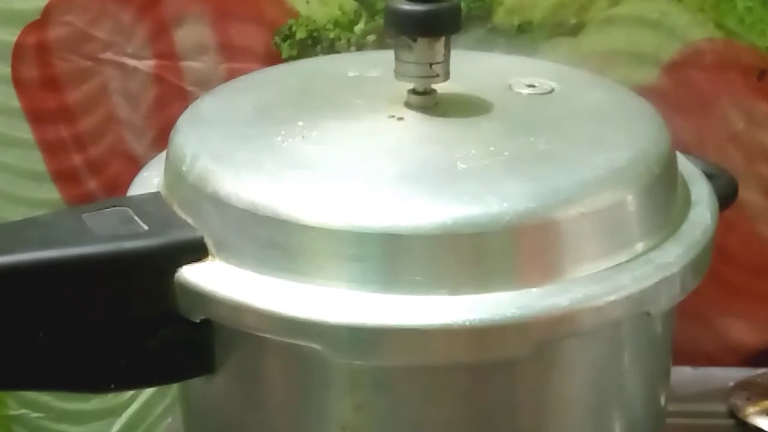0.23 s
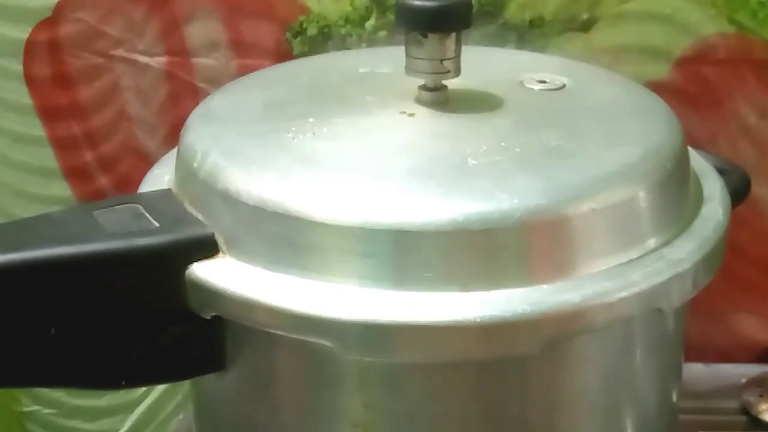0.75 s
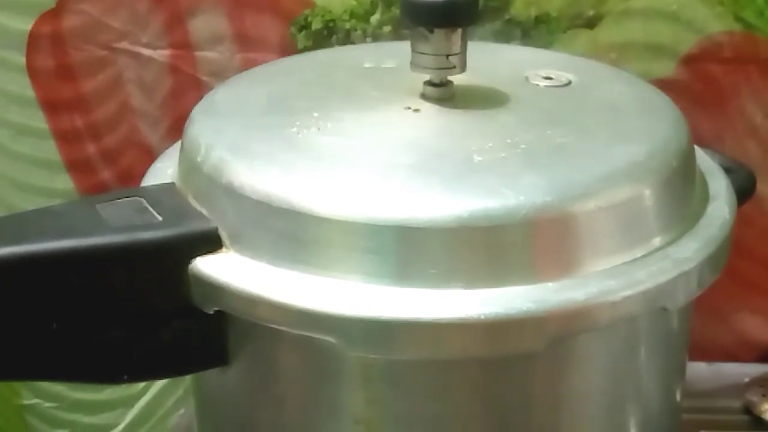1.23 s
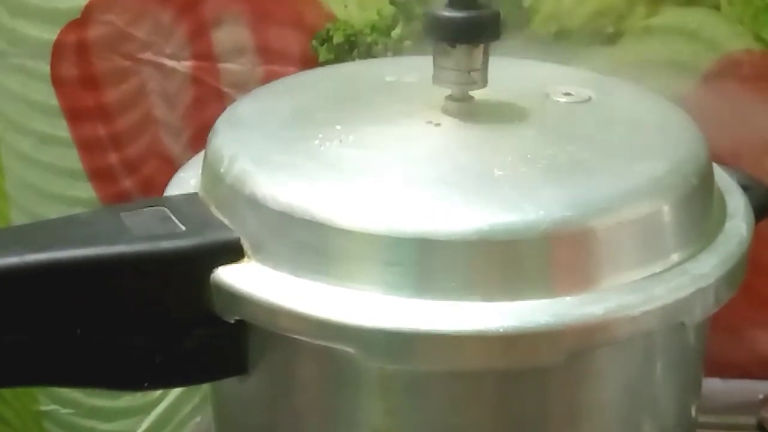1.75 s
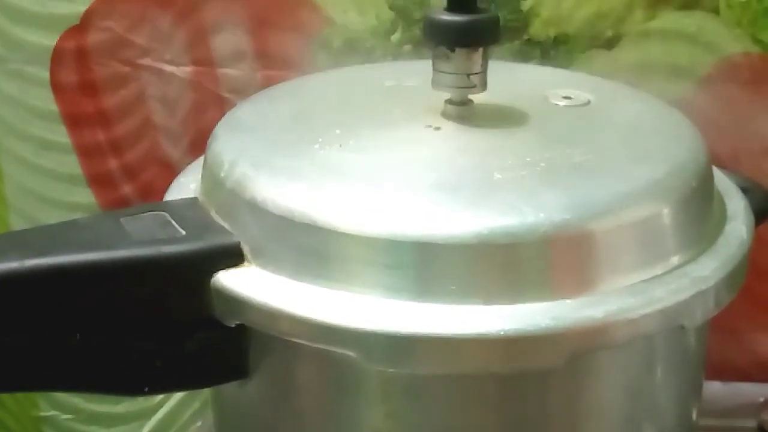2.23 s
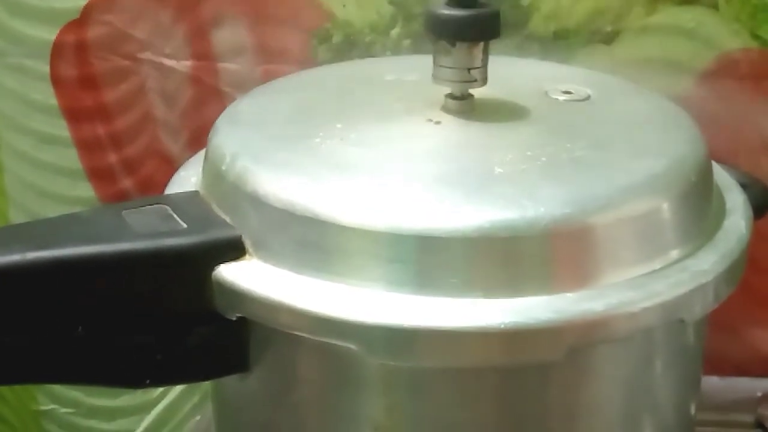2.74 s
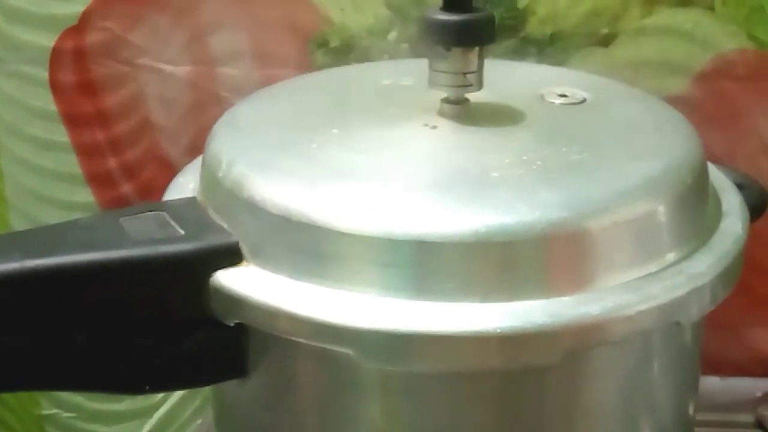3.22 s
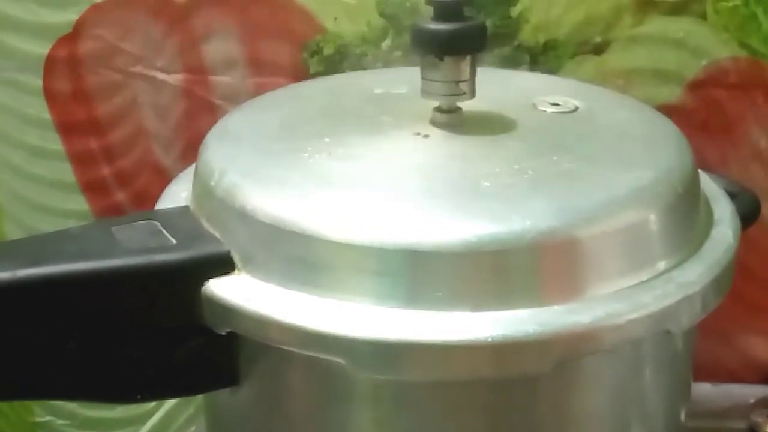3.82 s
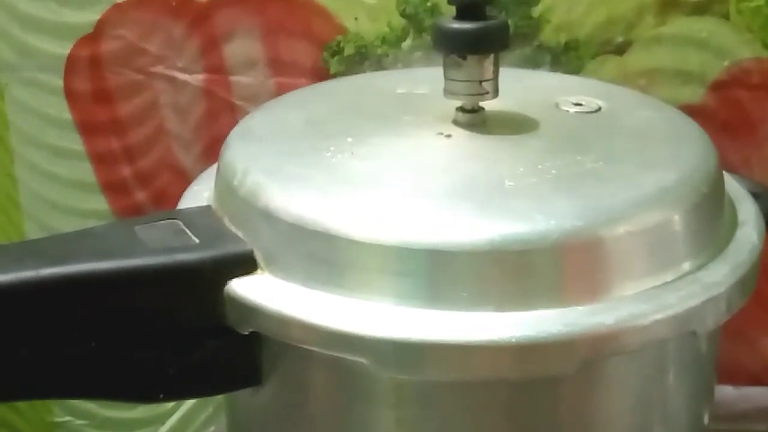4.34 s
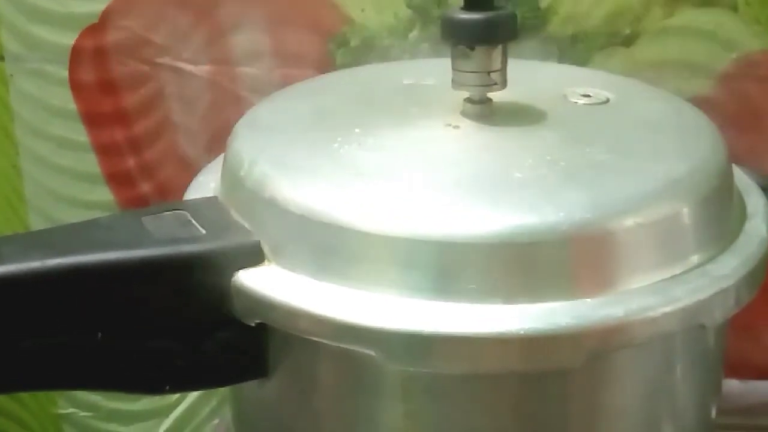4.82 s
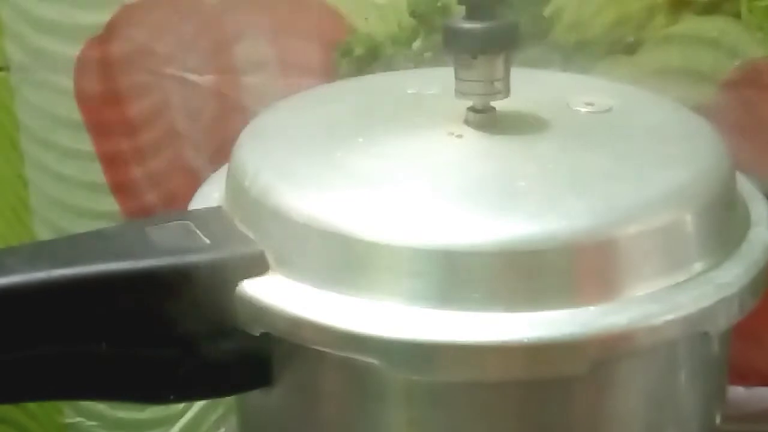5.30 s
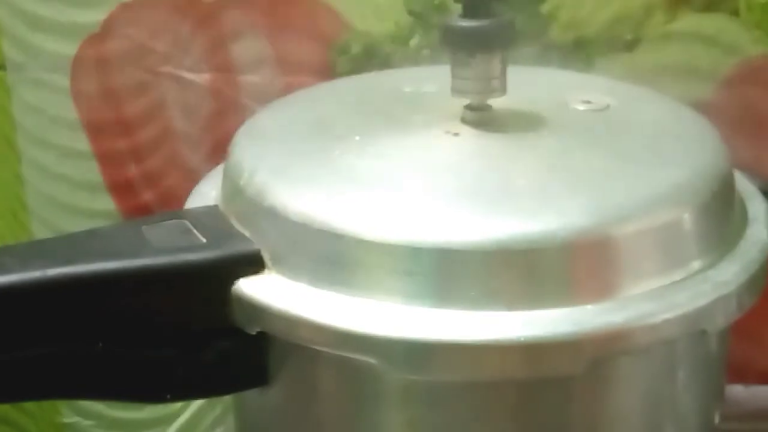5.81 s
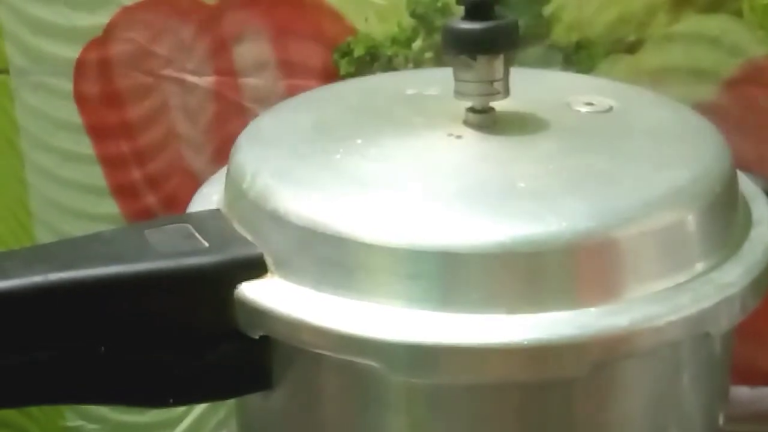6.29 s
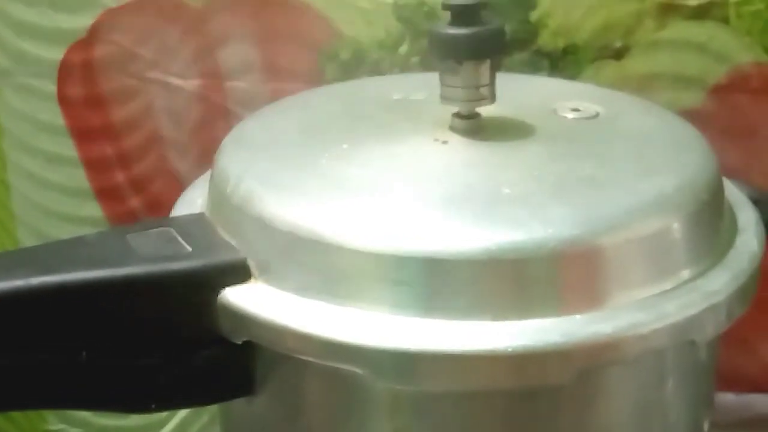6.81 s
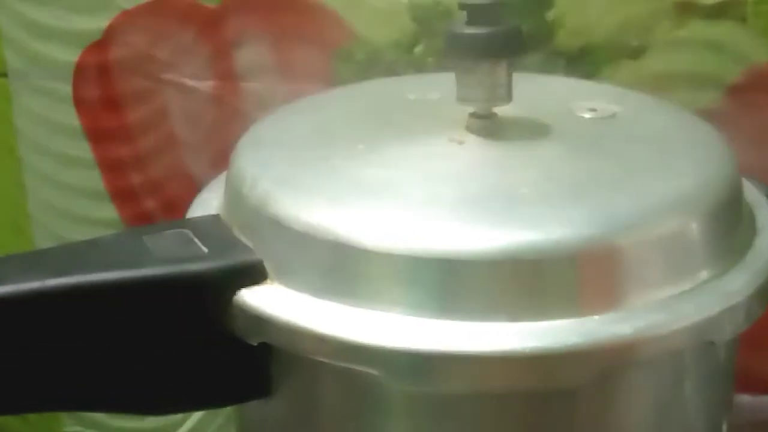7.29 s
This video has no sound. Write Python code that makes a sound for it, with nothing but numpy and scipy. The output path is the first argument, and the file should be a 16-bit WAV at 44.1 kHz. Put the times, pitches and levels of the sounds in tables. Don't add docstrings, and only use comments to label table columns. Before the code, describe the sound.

From 0 s a harsh, loud steam jet is already blowing at full force, close and central: a pressure cooker venting past its weight valve in a kitchen. It is noise rather than a pure tone, strongest around 3 to 4 kHz and 5 to 8 kHz, giving a piercing, whistling hiss with airy fizz above and very little low wash. Rapid flutter roughens it and irregular gusts make the level waver several times a second. At about 0.73 s it cuts to silence, returning abruptly at 0.85 s. From then on it runs unbroken, the lower roar slowly sinking so the hiss grows thinner and sharper. Faint short reflections add slight metallic colour. Barely noticeable stereo flecks appear near 0.4, 0.6, 0.9, 1.2, 3.3, 5.3 and 6.8 s. From 6.1 s it fades evenly, reaching silence around 7.7 s.

```python
import sys
import numpy as np
from scipy import signal
from scipy.fft import rfft, irfft
from scipy.io import wavfile
from scipy.ndimage import uniform_filter1d

SR = 44100
rng = np.random.default_rng(int(sys.argv[2]) if len(sys.argv) > 2 else 0)


def master_out(mix):
    frames = np.transpose(np.atleast_2d(mix))
    ceiling = np.clip(frames, -1, 1)
    pcm = np.round(ceiling * 32767).astype(np.int16)
    wavfile.write(sys.argv[1], SR, pcm)


def gain_from_db(level_db):
    decades = np.asarray(level_db, float) / 20
    return 10 ** decades


N = 332936

# (frequency [Hz], density [dB per Hz])
JET_COLOUR = [(10.0, -24.0), (310.0, -21.6), (1050.0, -20.5), (1780.0, -16.5), (2650.0, -10.0),
              (3430.0, 0.0), (4220.0, -8.7), (5040.0, -12.0), (5320.0, -6.7), (6040.0, -2.2),
              (7170.0, -0.3), (7820.0, -7.2), (8240.0, -13.9), (16000.0, -20.3)]
# (centre [Hz], width [Hz], start level [dB], end level [dB])
PIPE_RINGS = [(653, 258, 1.9, 0.9), (1137, 140, 2.5, 5.6), (2418, 66, 2.6, 3.5), (2783, 110, 2.5, 3.4),
              (3152, 249, -2.4, -6.5), (3498, 457, -2.1, -7.0), (3607, 42, 0.9, 1.2),
              (3968, 234, -3.5, -8.7), (4064, 107, 4.9, 4.4), (4375, 134, 1.2, -4.9), (5437, 40, 3.9, 0.1),
              (5491, 50, -3.1, -4.7), (5597, 40, -0.2, 4.0), (6225, 222, 4.4, 4.7), (6476, 148, -2.5, -1.7),
              (6632, 201, 8.4, 6.8), (6776, 78, -4.5, -2.9), (6857, 43, 1.1, 3.8), (7029, 80, 5.2, -5.5),
              (7327, 40, 2.4, -2.6), (7463, 115, -3.3, -4.8), (7928, 198, -4.2, -4.7),
              (8056, 153, 2.9, -1.0), (10111, 173, 1.7, 4.6), (10515, 164, 3.2, 5.9),
              (10974, 618, 3.8, 2.1), (11713, 295, -2.1, -1.9), (12659, 466, -0.9, 2.9),
              (13786, 390, -2.9, -2.2), (14764, 833, 7.2, 3.0)]
# (low edge [Hz], high edge [Hz])
BANDS_HZ = [
    (5200, 8000),
    (2000, 4800),
    (8500, 15500),
    (100, 1500),
]
# (start level re whistle [dB], slope [dB/s])
PRESSURE_SAG = [
    (-5.5, -0.5334),
    (-10, -0.12),
    (-20.5, -0.17),
]
# (delay [s], level [dB])
ECHOES = [(.00833, -30), (.01283, -27)]
# (time [s], low edge [Hz], high edge [Hz], level re band [dB])
WIDE_BURSTS = [
    (.402, 5140, 6280, -1),
    (.611, 13700, 15700, -3),
    (.89, 11800, 13200, -1),
    (1.215, 4700, 5850, -6),
    (3.281, 10300, 12500, -3),
    (5.348, 6900, 8400, -3),
    (6.788, 6900, 8400, -6),
    (6.788, 12400, 13900, -3),
]
# (start [s], end [s])
DROPOUT_S = (.7303, .846)
# (start [s], reaches silence [s])
FADE_S = (6.1, 7.746)


def evened(x):
    return x / np.sqrt(np.mean(x ** 2) + 1e-20)


def band(x, lo_hz, hi_hz):
    hz = np.fft.rfftfreq(len(x), 1 / SR)
    return irfft(rfft(x) * ((hz > lo_hz) & (hz < hi_hz)), len(x))


def above(hz, edge_hz, width_hz):
    return .5 + .5 * np.tanh((hz - edge_hz) / width_hz)


def pipe_colour_db(hz, t):
    colour_hz, colour_db = np.transpose(JET_COLOUR)
    field_db = np.interp(np.log(hz + 1), np.log(colour_hz + 1), colour_db)
    for centre_hz, width_hz, start_db, end_db in PIPE_RINGS:
        ring_db = start_db + (end_db - start_db) * t * SR / N
        field_db = field_db + ring_db / (1 + (2 * (hz - centre_hz) / width_hz) ** 2)
    return field_db


def pressure_sag_db(field_db, hz, t):
    power = gain_from_db(2 * field_db)
    levels_db = [10 * np.log10((power * (hz > lo) * (hz < hi)).sum(0)) for lo, hi in BANDS_HZ]
    whistle_db, *others_db = levels_db
    wash_share = 1 - above(hz, 1700, 300)
    fizz_share = above(hz, 8100, 300)
    roar_share = 1 - above(hz, 5000, 250) - wash_share
    shares = (roar_share, fizz_share, wash_share)
    for share, (start_db, slope_db_s), own_db in zip(shares, PRESSURE_SAG, others_db):
        field_db = field_db + share * (start_db + slope_db_s * t - own_db + whistle_db)
    return field_db - whistle_db


def patches(noise, bins, frames):
    smooth = uniform_filter1d(noise, size=bins, axis=0)
    return evened(uniform_filter1d(smooth, size=frames, axis=1))


def flow_gain():
    flutter = evened(band(rng.standard_normal(N), 22, 60))
    gusts = evened(band(rng.standard_normal(N), 3.3, 15))
    return gain_from_db(0.24 * flutter + 0.42 * gusts + 0.04)


def jet():
    size, hop = 2048, 512
    frames = N // hop + 5
    hz = np.fft.rfftfreq(size, 1 / SR)[:, None]
    t = np.arange(frames) * hop / SR
    field_db = pressure_sag_db(pipe_colour_db(hz, t), hz, t)
    real, imag, fine, wide = rng.standard_normal((frames, len(hz), 4)).T
    field_db = field_db + 1.2 * patches(fine, 4, 70)
    field_db = field_db + 0.43 * patches(wide, 90, 8)
    spectra = (real + 1j * imag) * gain_from_db(field_db)
    hiss = signal.istft(spectra, nperseg=size, noverlap=size - hop)[1][:N]
    whistle_rms = np.sqrt(np.mean(band(hiss, *BANDS_HZ[0]) ** 2))
    hiss = gain_from_db(-15.5) * hiss / whistle_rms
    return hiss * flow_gain()


def kitchen(x):
    decay_s, tail_db, spacing = 0.18, -18, 20
    taps = np.zeros(SR // 4)
    at = np.arange(200, len(taps) - spacing, spacing)
    at = at + rng.integers(0, spacing, len(at))
    taps[at] = rng.choice([-1., 1.], len(at)) * gain_from_db(-60 * at / SR / decay_s)
    taps = gain_from_db(tail_db) * taps / np.linalg.norm(taps)
    taps[0] = 1
    for delay_s, level_db in ECHOES:
        taps[round(delay_s * SR)] += gain_from_db(level_db)
    return signal.fftconvolve(x, taps / np.linalg.norm(taps))[:N]


def scene():
    return np.tile(kitchen(jet()), (2, 1))


def add_wide_bursts(out):
    half, first = 1024, 332
    size = 2 * half
    window = np.sin(np.pi * (np.arange(size) + .5) / size)
    for time_s, lo_hz, hi_hz, level_db in WIDE_BURSTS:
        start = first + half * round((time_s * SR - first) / half - 1)
        own = band(out[0, start:start + size], lo_hz, hi_hz)
        phases = np.exp(2j * np.pi * rng.random(half + 1))
        other = window * irfft(abs(rfft(own)) * phases)
        rise, fall = other.reshape(2, half)
        other = np.concatenate([rise - rise[::-1], fall + fall[::-1]])
        side = gain_from_db(level_db) * other * [[1], [-1]]
        out[:, start:start + size] += window * (side - 0.11 * window * own)
    return out


def low_pass(x):
    return signal.sosfilt(signal.butter(12, 15920, fs=SR, output="sos"), x)


def record(dry):
    t = np.arange(N) / SR
    out = 1.319 * np.tanh(dry / 1.29)
    out = out * ((t < DROPOUT_S[0]) | (t > DROPOUT_S[1]))
    out = out * np.clip((FADE_S[1] - t) / (FADE_S[1] - FADE_S[0]), 0, 1)
    out = add_wide_bursts(out)
    lowpass = signal.firwin(1001, 15740, window=("kaiser", 8), fs=SR)
    out = signal.oaconvolve(out, lowpass[None], "same")
    return low_pass(out)


dry = scene()
out = record(dry)
master_out(out)
```